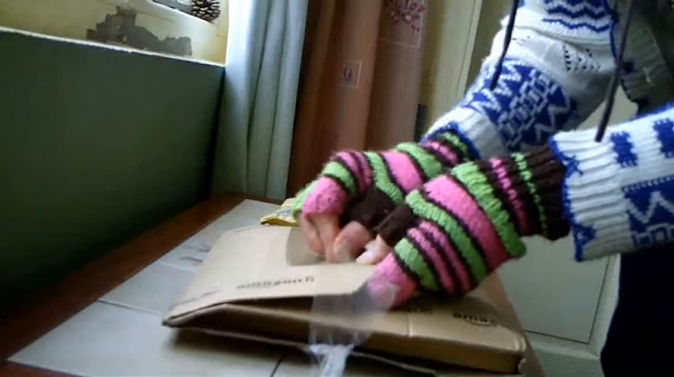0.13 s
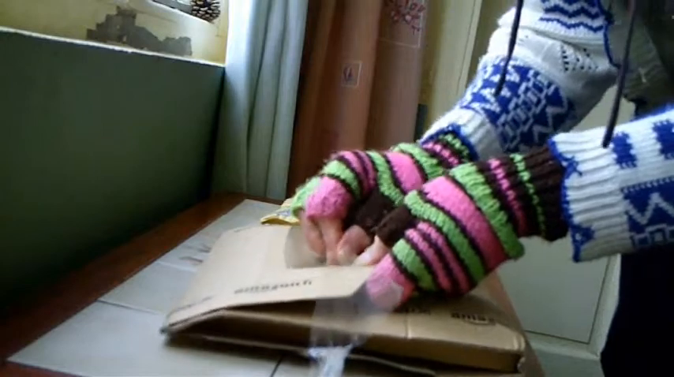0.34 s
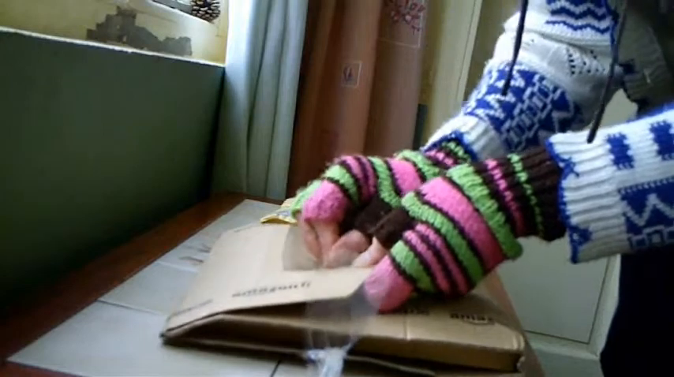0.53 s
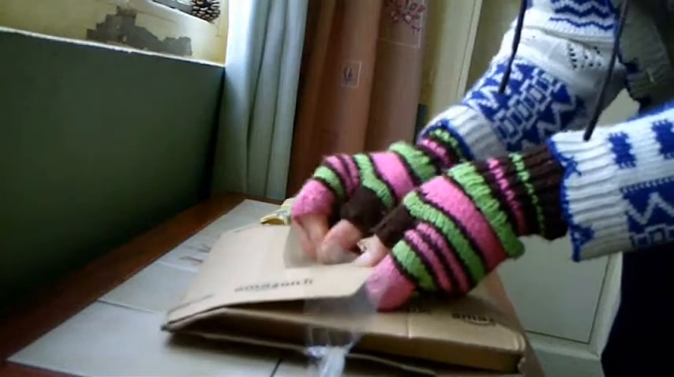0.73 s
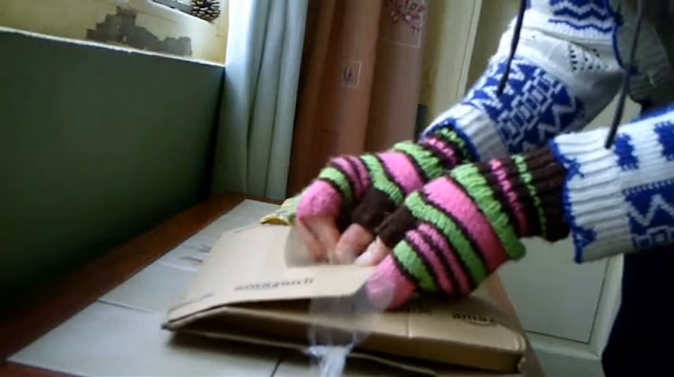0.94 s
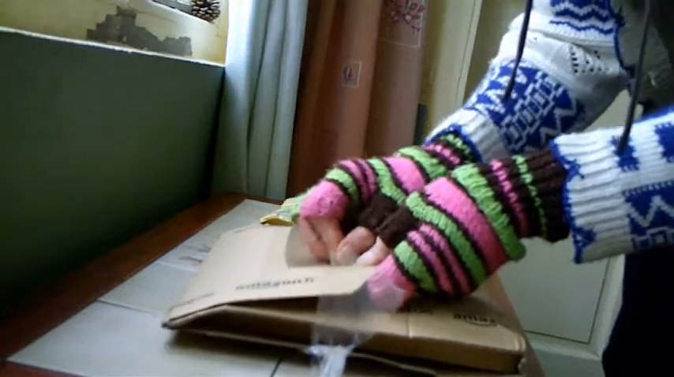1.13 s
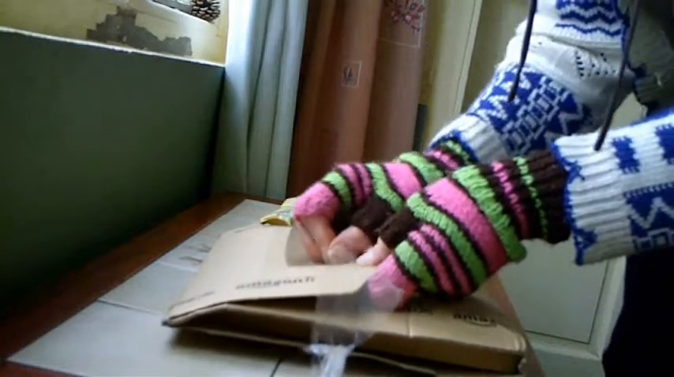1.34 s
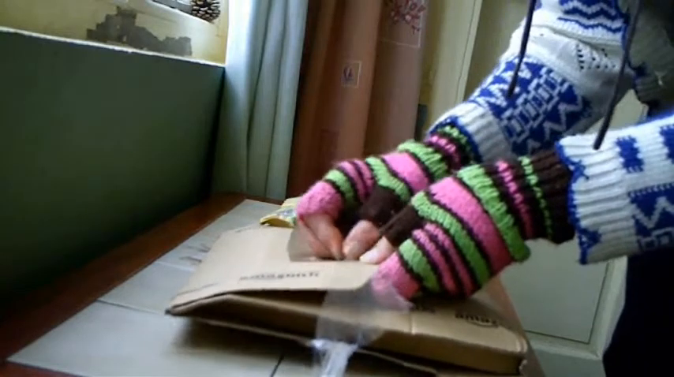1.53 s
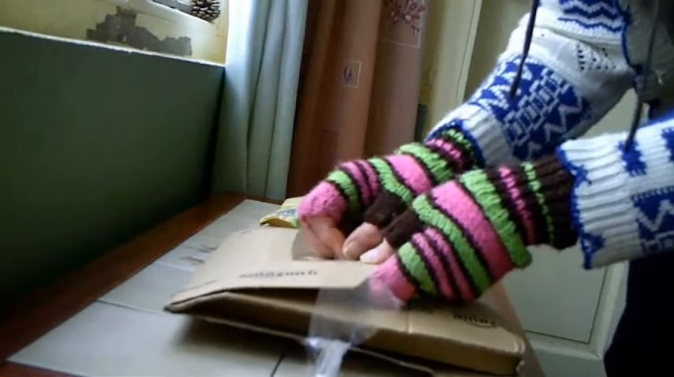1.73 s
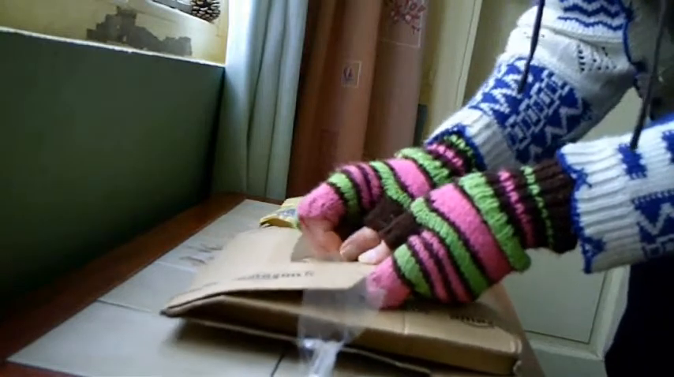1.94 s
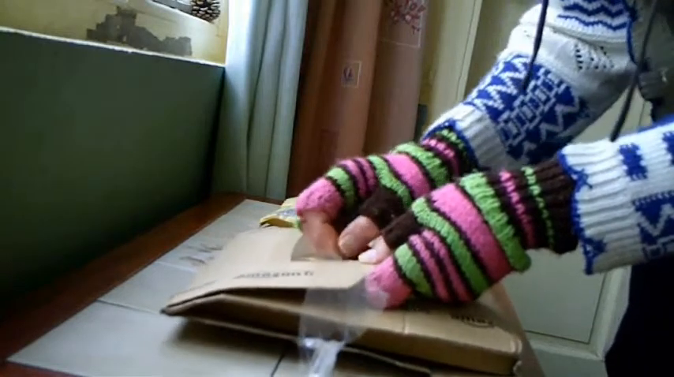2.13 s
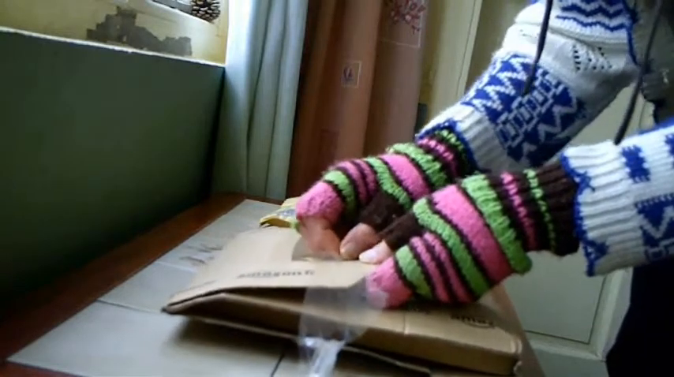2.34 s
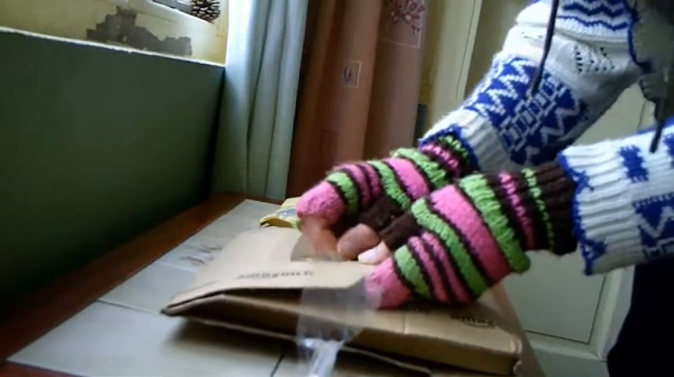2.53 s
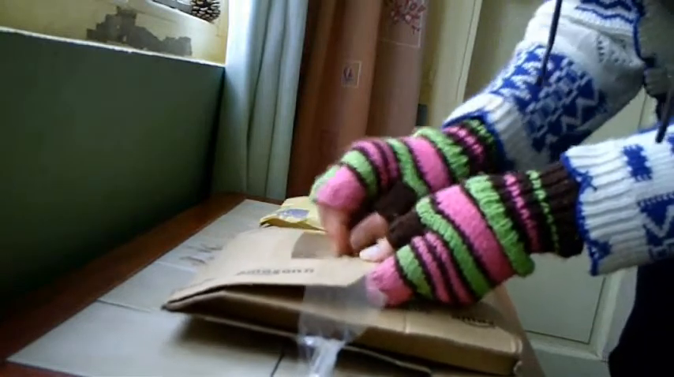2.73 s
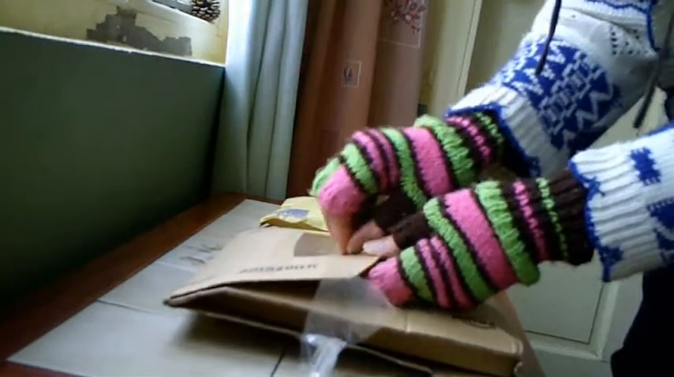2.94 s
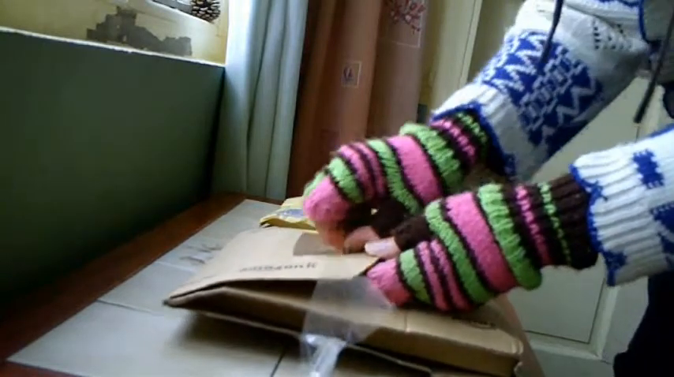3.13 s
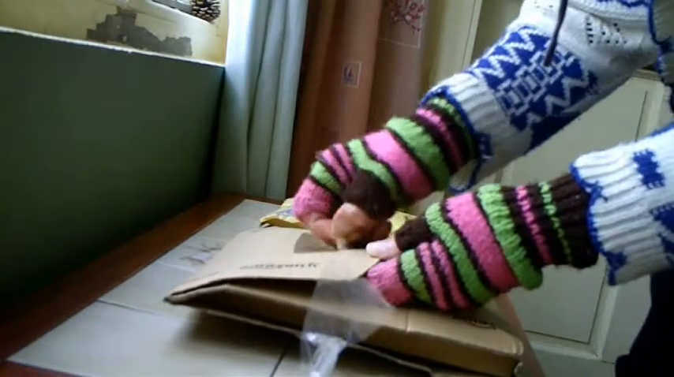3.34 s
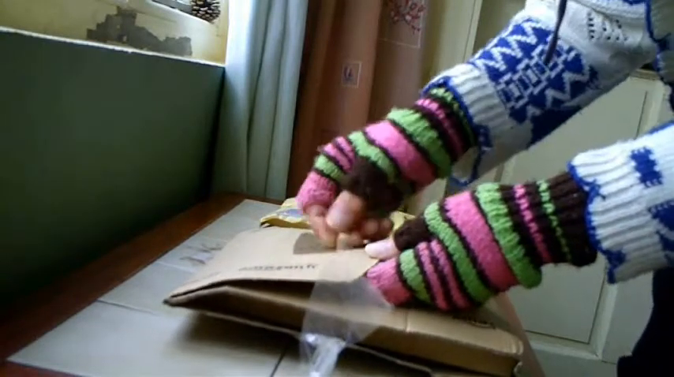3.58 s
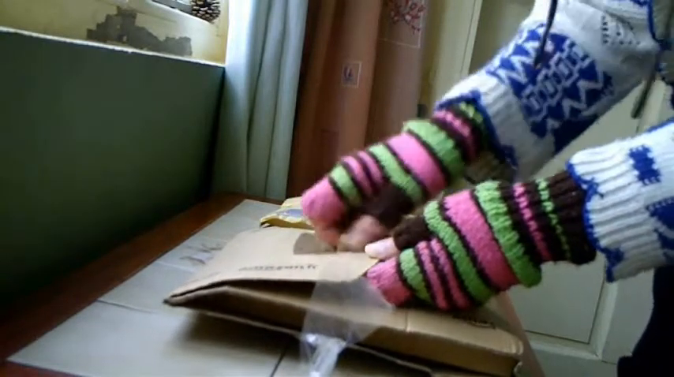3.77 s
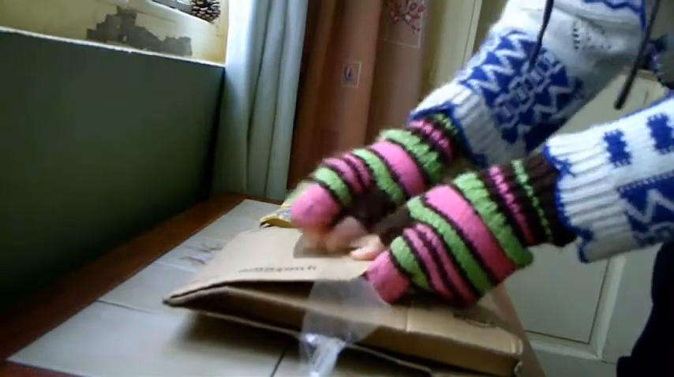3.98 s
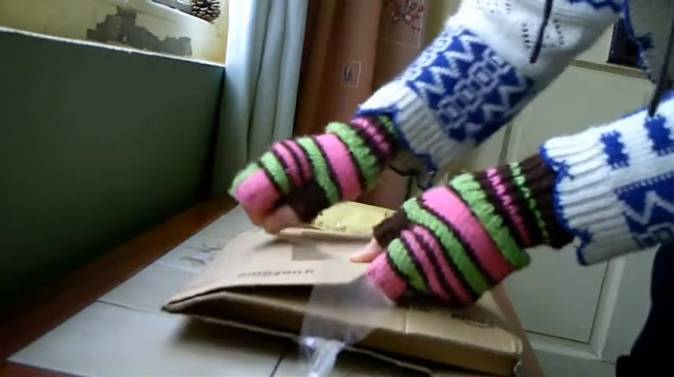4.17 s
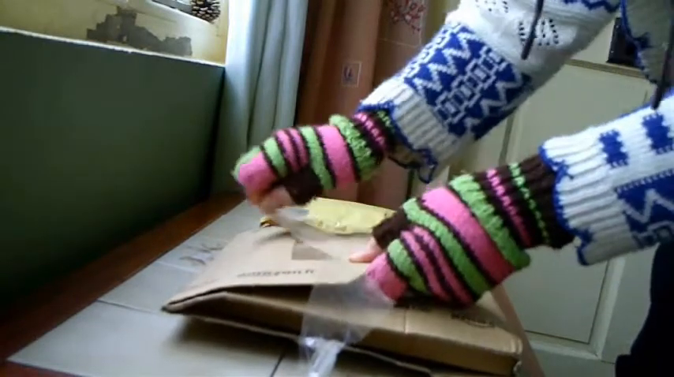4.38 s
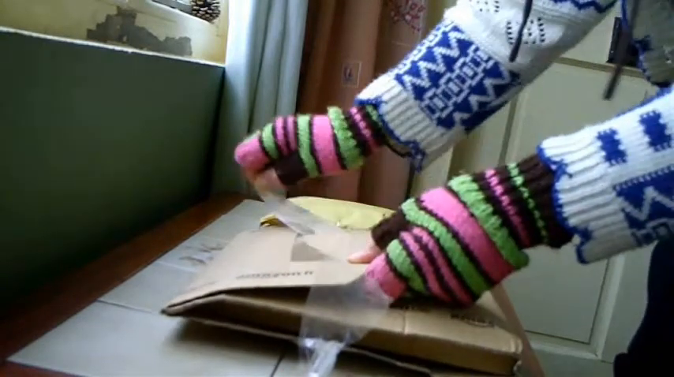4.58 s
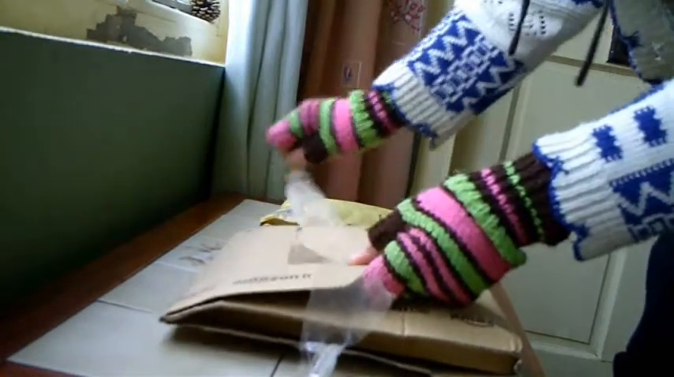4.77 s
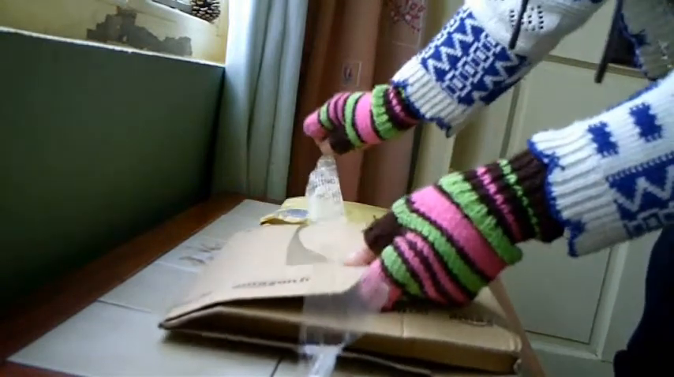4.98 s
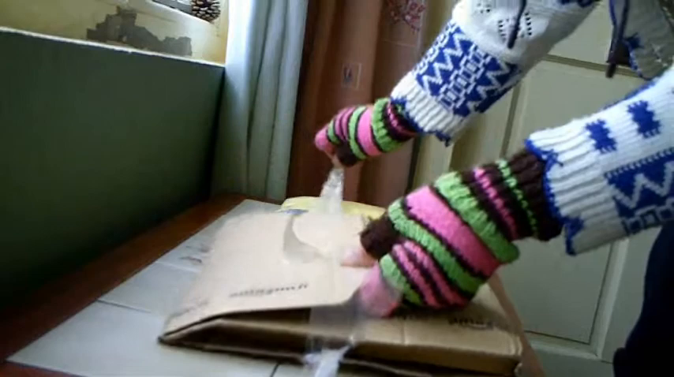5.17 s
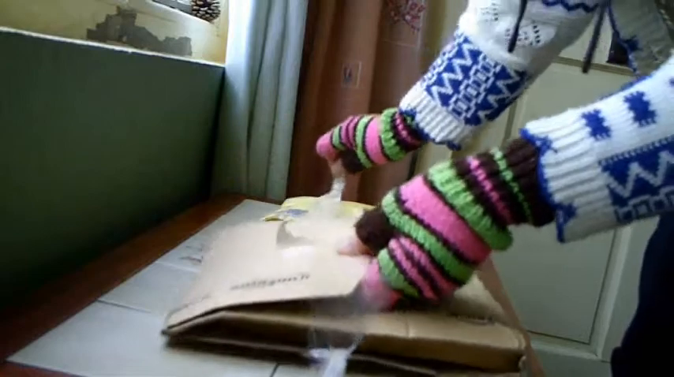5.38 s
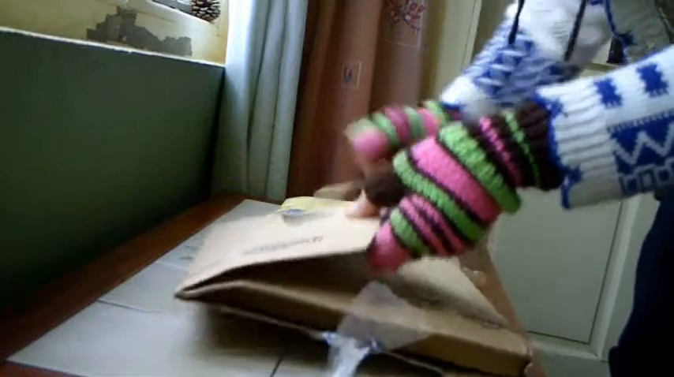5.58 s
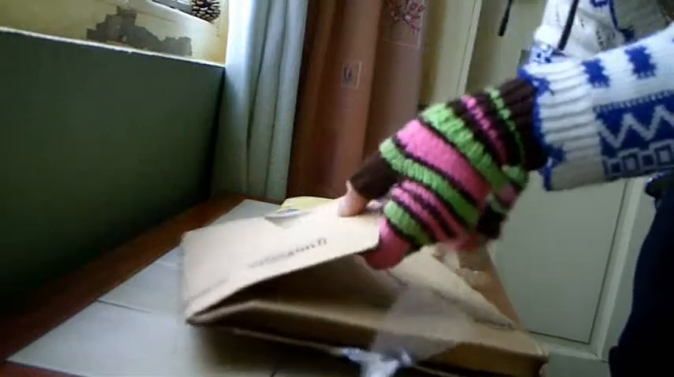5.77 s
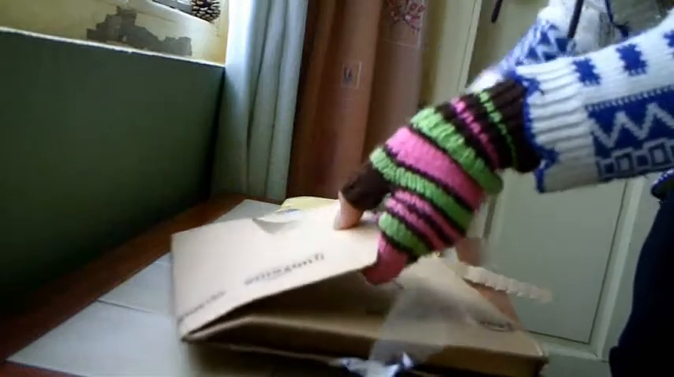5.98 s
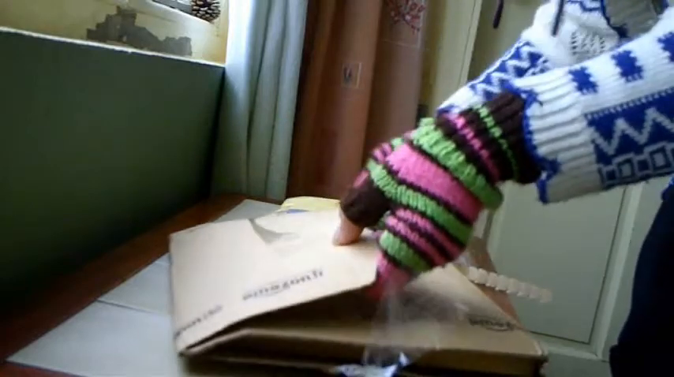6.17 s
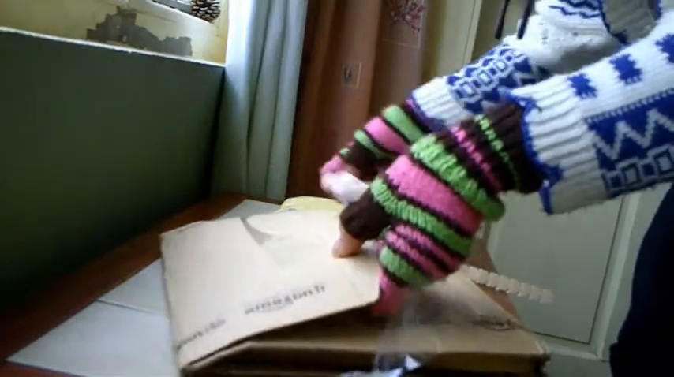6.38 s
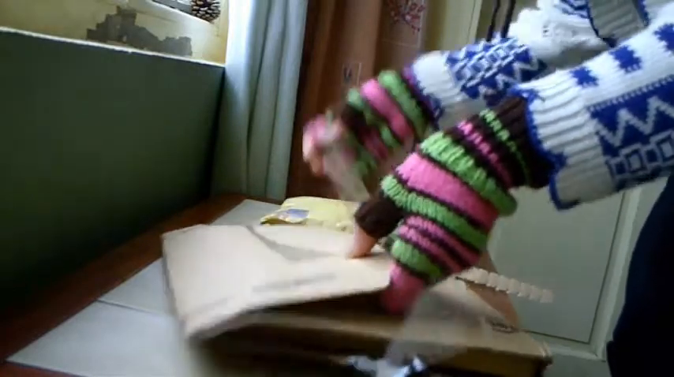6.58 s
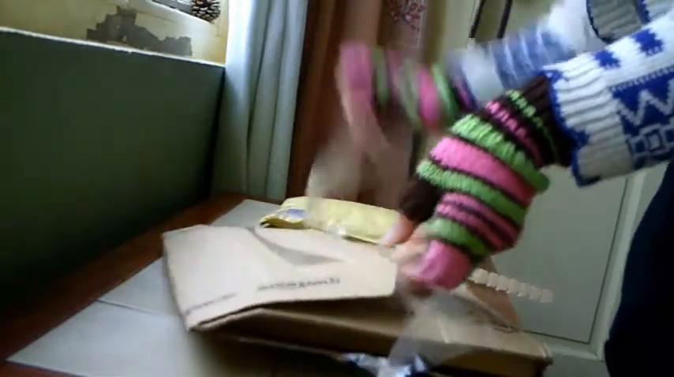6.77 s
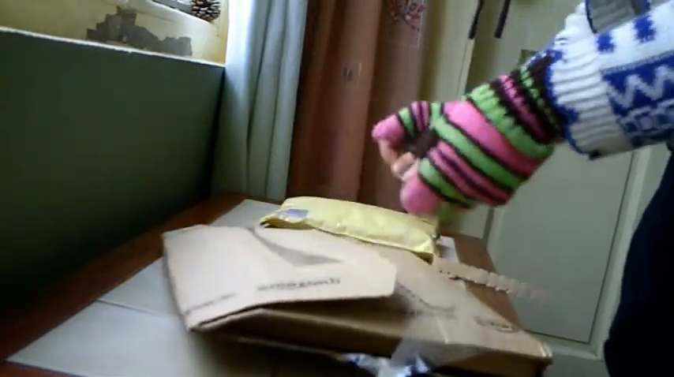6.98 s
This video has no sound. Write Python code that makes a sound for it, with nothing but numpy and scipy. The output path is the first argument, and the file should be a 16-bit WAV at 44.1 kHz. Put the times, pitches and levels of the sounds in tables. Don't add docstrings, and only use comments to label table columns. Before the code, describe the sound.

Sticky tape is peeled and ripped off a cardboard parcel by hand, with sharp cracks, hollow knocks and dense crackling rasps over low traffic rumble.

```python
import sys
import numpy as np
from scipy import signal
from scipy.fft import rfft, irfft, next_fast_len
from scipy.io import wavfile

SR = 44100
rng = np.random.default_rng(int(sys.argv[2]) if len(sys.argv) > 2 else 0)


def how_loud(loudness_db):
    steps = np.asarray(loudness_db, float) / 20
    return 10 ** steps


def master_out(mix):
    frames = np.transpose(np.atleast_2d(mix))
    ceiling = np.clip(frames, -1, 1)
    pcm = np.round(ceiling * 32767).astype(np.int16)
    wavfile.write(sys.argv[1], SR, pcm)


N = 309141


def rms_one(x):
    return x / np.sqrt(np.mean(x ** 2) + 1e-20)


def in_time(rows):
    s, *columns = np.transpose(rows)
    return [np.interp(np.arange(N) / SR, s, column) for column in columns]


def drift(rate_hz):
    r = np.exp(-2 * np.pi * rate_hz / SR)
    wander = signal.lfilter([1], [1, -2 * r, r * r], rng.standard_normal(N + SR))
    return rms_one(wander[SR:])


def coloured(spectrum):
    hz, db = np.transpose(spectrum)
    size = next_fast_len(N)
    grid = np.arange(size // 2 + 1) * SR / size + 1
    colour = how_loud(np.interp(np.log(grid), np.log(hz), db))
    return rms_one(irfft(rfft(rng.standard_normal(size)) * colour, size)[:N])


def band(x, low_hz, high_hz):
    sos = signal.butter(2, [low_hz, high_hz], "band", fs=SR, output="sos")
    return signal.sosfilt(sos, x) * np.sqrt(SR / 2 / (high_hz - low_hz))


def ring(x, hz, width_hz):
    r = np.exp(-np.pi * width_hz / SR)
    poles = [1, -2 * r * np.cos(2 * np.pi * hz / SR), r * r]
    return signal.lfilter([(1 - r * r) / 2, 0, (r * r - 1) / 2], poles, x + 1e-18)


def resonate(x, modes, shift_db=0):
    click = np.eye(1, 8192)[0]
    power, out = 0, 0
    for k, (hz, width_hz, db) in enumerate(modes):
        power += np.sum((how_loud(db) * ring(click, hz, width_hz)) ** 2)
        grip_db = shift_db * drift(1.87) if shift_db else 0
        out = out + ring((-1) ** k * how_loud(db + grip_db) * x, hz, width_hz)
    return out / np.sqrt(power)


def snaps(per_s, spread_db):
    sizes = how_loud(spread_db * np.minimum(rng.exponential(1, N), 4)) * rng.choice([-1, 1], N)
    return rms_one(sizes) * (rng.random(N) < per_s / SR) * np.sqrt(SR / per_s)


def resigned(x):
    return x * (-1) ** np.arange(N)


# pitch in Hz, width in Hz, level in dB.
PANELS = [(158.4, 23, -7.5), (234, 18.7, 1.5), (279.4, 16, 1.5), (340, 39, -1.5), (433, 37, -3.5),
          (466, 56, -3.5), (533, 26, -0.5), (615.6, 33, -5.5), (729, 18.7, -6.5), (908, 153, -12),
          (1175, 76, -11.5), (1350, 550, -19.5)]


def board_panels(x, shift_db=0):
    return resonate(x, PANELS, shift_db)


# frequency in Hz, level in dB per Hz.
RUMBLE_SPECTRUM = [(4.7, 0), (8.0, -21), (33, 6), (59, -0.5), (86, -3), (108, -17.5), (151, -8), (172, -21),
                   (224, -14), (296, -29), (325, -22), (371, -30), (455, -28.5), (592, -36), (700, -45),
                   (910, -39), (1540, -120)]
# frequency in Hz, level in dB per Hz.
HISS_SPECTRUM = [(290, 0), (500, -2.5), (660, -3), (950, -4), (1380, -5), (2190, -8.5), (5880, -14.5),
                 (6330, -13.5), (9630, -17), (14500, -19.5), (17000, -22)]
# time in seconds, rumble in dB, boost of the upper rumble in dB.
TRAFFIC_FLOW = [
    (0, -31.5, 8.5),
    (1.4, -27, 2),
    (2.1, -29, 2),
    (3, -27, -9.5),
    (4, -29, -1),
    (5.5, -27, -2.5),
    (7.01, -29, -4),
]


def background():
    rumble_db, upper_db = in_time(TRAFFIC_FLOW)
    rumble = coloured(RUMBLE_SPECTRUM)
    upper = signal.sosfiltfilt(signal.butter(3, 185, "high", fs=SR, output="sos"), rumble)
    rumble = rumble + upper * (how_loud(upper_db) - 1)
    hiss = how_loud(-42 + drift(33)) * coloured(HISS_SPECTRUM)
    return how_loud(rumble_db + 2.5) * rumble + hiss


# time in seconds, firing rate in Hz, level in dB.
ENGINE_RUN = [(0, 118, -41), (.9, 118, -46.5), (1.6, 118, -46.5), (2.8, 122, -41.5), (3.8, 122, -42),
              (4.2, 116, -34.5), (4.7, 120, -35), (5.2, 121, -44), (5.5, 124, -37), (6.0, 128, -33.5),
              (6.5, 132, -37), (6.8, 134, -41), (7.01, 135, -45)]


def engine():
    hz, db = in_time(ENGINE_RUN)
    waver_hz = 0.5 * drift(3)
    level = np.sqrt(2) * how_loud(db + 2 * drift(8.5))
    return level * np.sin(2 * np.pi * np.cumsum(hz + waver_hz) / SR)


# start in seconds, peak in dB, pitch in Hz, T60 in seconds.
LOW_THUDS = [
    (1.939, -29, 190, 0.06),
    (5.118, -12, 166, 0.089),
    (5.218, -16, 158.6, 0.19),
    (6.398, -30.5, 510, 0.19),
    (1.352, -28, 860, 0.1),
]


def thuds():
    out, t = np.zeros(N), np.arange(N) / SR
    for s, peak_db, hz, t60_s in LOW_THUDS:
        since = np.maximum(t - s, 0)
        onset = np.minimum(since / 0.0039, 1)
        out += how_loud(peak_db - 60 * since / t60_s) * onset * np.sin(2 * np.pi * hz * since)
    return out


# start in seconds, peak in dB, ring in Hz, bare click over the ring in dB.
TAPE_TICKS = [(2.3194, -44, 2280, -8), (2.4284, -38, 2960, 13), (2.6923, -21, 2620, -4),
              (2.7454, -29, 2450, -8), (2.81, -24.5, 9100, 2), (2.832, -19, 7150, 10),
              (2.849, -21, 9200, 7), (2.8736, -23, 2880, -8), (2.8844, -41, 2550, -8),
              (3.1777, -31, 7500, 8), (3.633, -27, 7540, -8), (4.1593, 0.5, 10800, -8),
              (4.173, -4, 10200, -6), (4.1996, -7, 9400, -15), (5.337, -8.5, 2840, -21),
              (5.502, -21.5, 2870, -8), (5.8864, -15, 7900, 10), (6.084, -11, 2340, -16),
              (6.129, -3, 2800, -18), (6.158, -12, 2970, 2.5), (0.043, -16, 2950, -27),
              (6.305, -25, 9500, -8), (6.3294, -27, 3020, -8), (6.3599, -20, 10000, -8),
              (6.4386, -24, 9100, -4), (6.503, -18, 2340, -1), (6.747, -17, 4260, -14),
              (6.878, -26, 3050, 5.5), (6.9366, -25, 2530, -15), (6.9848, -23, 10500, -2)]


def ticks():
    click = np.eye(1, 512)[0]
    out = np.zeros(N + len(click))
    for s, peak_db, hz, bare_db in TAPE_TICKS:
        i = round((s + 0.0015) * SR)
        tick = resonate(click, [(hz, hz * 0.058, 0)]) + how_loud(bare_db) * band(click, 2500, 13400)
        out[i:i + len(click)] += how_loud(peak_db + 4.5) * tick
    return out[:N]


# start in seconds, length in seconds, fizz in dB, board in dB, sheet in dB.
SHORT_RIPS = [
    (1.915, 0.029, -35, -47, -46),
    (2.818, 0.045, -30, -44, -41),
    (3.274, .05, -24, -36, -38),
    (4.147, 0.025, -29, -21, -45),
    (5.203, 0.032, -24, -20, -26),
    (5.841, 0.039, -10, -30, -22.5),
]


def rips():
    t = np.arange(N) / SR
    board, sheet, fizz = np.zeros((3, N))
    for s, length_s, fizz_db, board_db, sheet_db in SHORT_RIPS:
        stop = how_loud(-60 * np.clip(t - s - length_s, 0, 1) / 0.11)
        swell = np.clip((t - s) / 0.003, 0, 1) * stop
        board += how_loud(board_db) * swell
        sheet += how_loud(sheet_db) * swell
        fizz += how_loud(fizz_db) * swell
    rough = how_loud(2 * drift(170)) * snaps(8200, 2.3)
    treble = signal.butter(2, 3800, "high", fs=SR, output="sos")
    air = 0.58 * signal.sosfilt(treble, fizz * rough)
    return board_panels(board * rough) + band(sheet * rough, 1090, 2700) + air


# start in seconds, peak in dB, board in dB.
FINGER_KNOCKS = [
    (0.579, -8.5, -25),
    (0.725, -44, -24),
    (1.07, -14, -33),
    (1.343, -17, -20),
    (1.439, -28, -26),
    (6.4, -37, -27),
]
# start in seconds, peak in dB, settling fizz in dB, board over fizz in dB, flap pitch in Hz.
SINGLE_CRACKS = [(1.563, -26.5, -50, -7, 2640), (1.917, -27, -37, 15, 1570), (1.942, -10.5, -28, -34, 2630),
                 (3.28, -15, -33, -8, 2800), (3.559, -19, -43, -16, 1270), (3.658, -16.5, -38, 5, 2640),
                 (3.771, -11, -36, 11.5, 1570), (3.831, -17, -38, -1, 2850), (3.852, -30, -21.5, -21, 2840),
                 (3.877, -11, -23, 1.5, 2380), (3.918, -15.5, -26.5, -6, 2620), (4.0, -17, -30, -8, 2750),
                 (5.545, -14, -30, 0, 1240), (5.658, -13, -23, -3, 1640), (5.845, -16, -20, -7, 2370),
                 (6.047, -23, -33, -30, 1870), (6.084, -12, -25.5, -33, 2300),
                 (6.128, -21, -25.5, -22, 2800), (6.157, -23, -31, -14, 2860), (6.735, -15, -32, -1, 1540)]
# start in seconds, peak in dB, settling fizz in dB, board over fizz in dB, flap pitch in Hz.
STRONG_CRACKS = [
    (0.043, -3.5, -37.5, 17.5, 1610),
    (2.120, -3, -24, -2, 1060),
    (2.608, 8, -17, -4, 1186),
    (5.211, 11, -12.5, -1.5, 2586),
    (5.428, 3, -27, 9, 1350),
    (6.682, -6.5, -30, 3, 1696),
]


def blows():
    rows = [(s, peak_db, board_db, board_db - 20, board_db - 26, 1000)
            for s, peak_db, board_db in FINGER_KNOCKS]
    for table, over_fizz_db in ((SINGLE_CRACKS, -1), (STRONG_CRACKS, 6)):
        for s, peak_db, fizz_db, board_db, hz in table:
            flap_db = fizz_db + over_fizz_db + 3.5 * np.log2(hz / 2000)
            rows.append((s, peak_db, fizz_db + board_db, flap_db, fizz_db, hz))
    return rows


def cracks():
    t = np.arange(4096) / SR
    board, rest = np.zeros((2, N + len(t)))
    grain, split = snaps(14000, 1.9), rng.choice([-1, 1], N)
    since = t - 0.004
    creep_db = -22
    creep = how_loud(creep_db) * np.exp(since / 0.0015)
    snap_off = np.exp(-since / 0.0011) * np.clip(since / 0.00056, how_loud(creep_db), 1)
    shape = np.where(since < 0, creep, snap_off)
    lull = (since > 0) * np.clip(0.47 + since / 0.012, 0, 1)
    settle_t60_s = 0.097
    settle = how_loud(-0.5 - 60 * (t / settle_t60_s) ** 1.036) * lull
    for s, peak_db, board_db, flap_db, fizz_db, hz in blows():
        i = round((s - 0.0034) * SR)
        here = slice(i, i + len(t))
        burst = how_loud(peak_db - max(board_db, flap_db, fizz_db) - 5) * shape
        snap = split[here] * burst + grain[here] * settle
        board[here] += how_loud(board_db) * (snap + 0.15 * burst)
        kick = 0.2 * burst * np.cos(2 * np.pi * hz * t)
        flap = 0.42 * resonate(snap + kick, [(hz, 400, 0)]) + 0.75 * band(snap, 920, 4620)
        rest[here] += how_loud(flap_db) * flap + how_loud(fizz_db) * band(snap, 3200, 13200)
    return board_panels(board[:N]) + rest[:N]


# start in seconds, hold in seconds, force in dB, grip on the board in dB, slack of the flap in dB.
SHORT_PULLS = [(1.738, 0.16, -41.5, -7, 0), (2.782, 0.11, -49, 5.5, -1), (2.973, 0.082, -50, 9, 3.5),
               (3.254, 0.1, -34, -6.5, -9), (3.377, 0.14, -33.5, -6.5, -7.5), (3.58, .06, -58, -6, -13),
               (3.832, .03, -39.5, -13, 0.5), (3.894, 0.057, -40, 4.5, 1), (5.344, 0.11, -39, -0.5, 4.5),
               (5.465, 0.12, -47.5, 3, 1), (5.575, 0.047, -45.5, -2, -14), (5.695, 0.043, -43.5, 0.5, -3),
               (5.735, 0.19, -36, -4.5, -3.5), (5.93, .03, -45.5, -10, 0), (6.244, .04, -48, -6, 0),
               (6.293, 0.1, -41.5, -3, -5), (6.414, 0.034, -40.5, -8, -6), (6.493, 0.043, -38.5, -16, -7.5),
               (6.567, 0.22, -47.5, 0, 2.5), (6.75, 0.037, -46.5, 3, -17), (6.90, .04, -48, 0, 1.5),
               (6.975, 0.025, -41, -6, -13)]
# time in seconds, force in dB, grip in dB, slack in dB.
FIRST_STRONG_PULL = [
    (3.965, -47, 4, -3),
    (4.01, -28.5, -7, -11),
    (4.05, -21.5, -3.5, -13),
    (4.1, -25, 4.5, -10),
    (4.14, -27, 3.5, -5),
    (4.18, -25.5, 4, -5),
    (4.215, -25, 0.5, -23),
]
# time in seconds, force in dB, grip in dB, slack in dB.
STRIPPING_PULL = [
    (4.328, -31.5, -4, -19),
    (4.46, -23.5, 2, -2.5),
    (4.58, -23, -2.5, -6),
    (4.88, -21.5, 0, 1),
    (4.96, -18, 0, 4.5),
    (5.0, -21, -1, -0.5),
    (5.044, -27, -5.5, -4),
    (5.091, -21.5, 0, -1.5),
    (5.2, -20.5, -9.5, -3),
]


def pulling():
    hop = 32
    t = np.arange(0, N, hop) / SR
    pulls = list(SHORT_PULLS)
    for pull in (FIRST_STRONG_PULL, STRIPPING_PULL):
        start_s, end_s = pull[0][0], pull[-1][0]
        pulls.append((start_s, end_s - start_s, *(curve[::hop] for curve in in_time(pull))))
    pulls.append((1.7, N, -56.5, 5.5, 0))
    attack_s, lingers = np.array([[0.038], [0.038], [0.053]]), np.array([[1], [1], [0]])
    power = 1e-12
    for s, hold_s, force_db, grip_db, slack_db in pulls:
        after = np.maximum(t - s - hold_s, 0)
        release = np.maximum(how_loud(-329 * after), lingers * how_loud(-10.5 - 85 * after))
        swell = np.clip((t - s + 0.019) / attack_s, 0, 1) ** 2
        tape_db = force_db + 0 * t
        drive = how_loud(np.array([tape_db, tape_db + slack_db, tape_db + grip_db]))
        power = power + (swell * release * drive) ** 2
    return [np.interp(np.arange(N) / SR, t, part) for part in 10 * np.log10(power)]


# pitch in Hz, width in Hz, level in dB.
FLAP_TONES = [(1500, 1200, 1), (1912, 150, 16), (2850, 450, 13), (3760, 2400, -7.5)]


def peel():
    tape_db, flap_db, board_db = pulling()
    fibre_db = tape_db - 4.5 + 0.31 * (flap_db - tape_db)
    clumps = how_loud(-1.5 * drift(123) + drift(41) - 1)
    per_s = np.clip(6000 * how_loud(0.76 * (tape_db + 26)), 700, 12000)
    glue = clumps * snaps(per_s, 0)
    slips = clumps * snaps(1500, 3.2)
    fibres = band(resigned(glue) * how_loud(fibre_db), 3600, 7100)
    sheen = band(glue * how_loud(tape_db), 5300, 14300)
    sheet = band(glue * how_loud(1.002 * tape_db - 4.5), 870, 6500)
    flex = band(resigned(slips) * how_loud(board_db - 5), 190, 740)
    panels = board_panels(slips * how_loud(board_db + 0.26), shift_db=4)
    flap = resonate(glue * how_loud(flap_db - 1), FLAP_TONES, shift_db=1.2)
    return panels + flap + fibres + sheen + sheet + flex


# delay in seconds, level in dB.
FIRST_ECHOES = [(.0072, -14), (.0115, -11), (.0148, -15), (.022, -17)]


def room(x):
    t = np.arange(int(0.3 * SR)) / SR
    t60_s, treble_t60_s = 0.14, 0.31
    tail = rng.standard_normal(len(t)) * how_loud(-60 * t / t60_s) * np.minimum(t / 0.01, 1) ** 2
    dull = signal.lfilter([0.3], [1, -0.7], tail)
    tail = dull + (tail - dull) * how_loud(-60 * t / treble_t60_s)
    answer = how_loud(-13) * tail / np.sqrt(np.sum(tail ** 2))
    answer[0] = 1
    for k, (s, db) in enumerate(FIRST_ECHOES):
        answer[round(s * SR)] += (-1) ** k * how_loud(db)
    return signal.fftconvolve(x, answer / np.sqrt(np.sum(answer ** 2)))[:N]


# centre in Hz, width in Hz, gain in dB.
PORT_PEAKS = [(4480, 1000, -3), (6730, 160, -9.5), (8060, 7200, 4.5), (11000, 580, -9)]


def housing(x):
    for hz, width_hz, db in PORT_PEAKS:
        w, g = 2 * np.pi * hz / SR, how_loud(db / 2)
        a = np.sin(w) * width_hz / hz / 2
        middle = -2 * np.cos(w)
        x = signal.lfilter([1 + a * g, middle, 1 - a * g], [1 + a / g, middle, 1 - a / g], x)
    return x


def scene():
    parcel = thuds() + ticks() + rips() + cracks() + peel()
    return (background() + engine() + housing(room(parcel)))[None]


def band_limit(x):
    return signal.sosfilt(signal.butter(12, 16630, fs=SR, output="sos"), x)


def record(dry):
    hz = np.arange(N // 2 + 1) * SR / N
    overloaded = np.clip(dry, -0.93, 0.93)
    treble_cut = np.where(hz < 15560, 1, how_loud(-50))
    mix = irfft(rfft(overloaded) * treble_cut, N)
    return band_limit(mix)


dry = scene()
out = record(dry)
master_out(out)
```